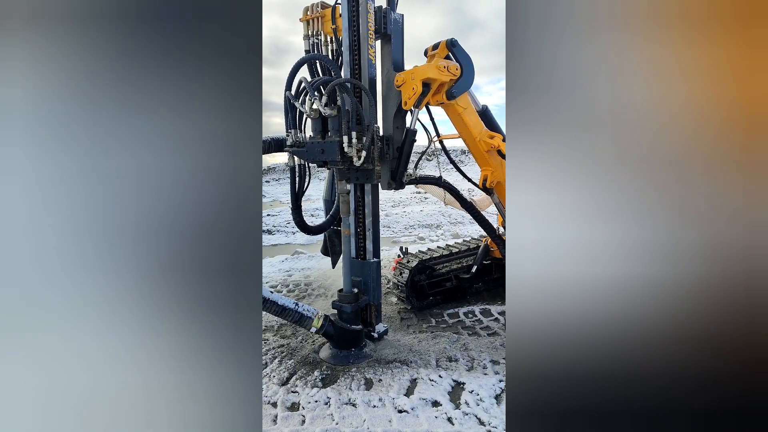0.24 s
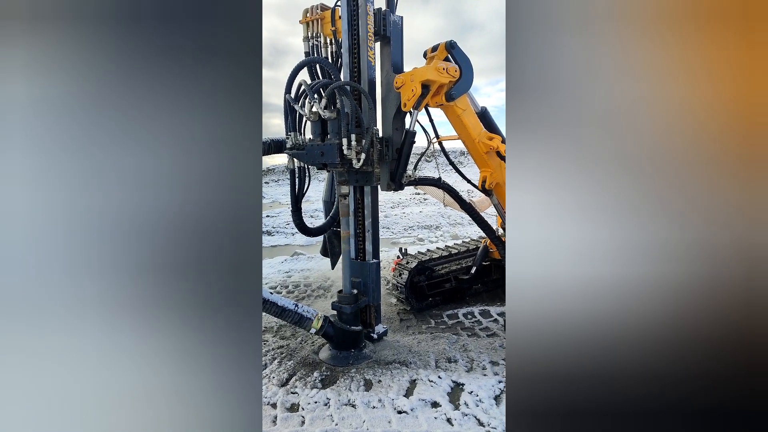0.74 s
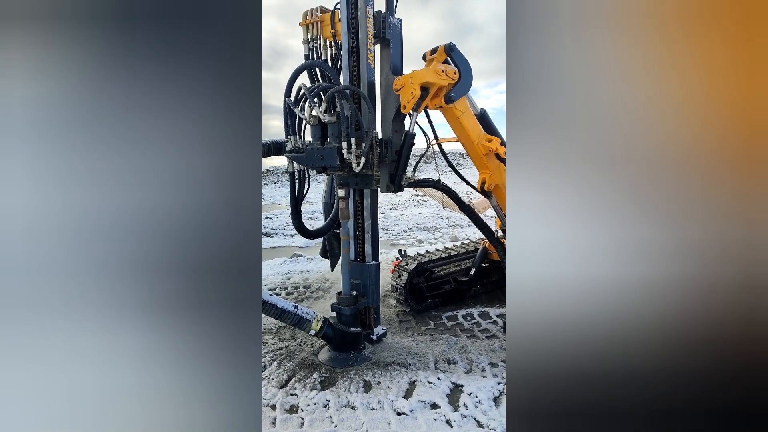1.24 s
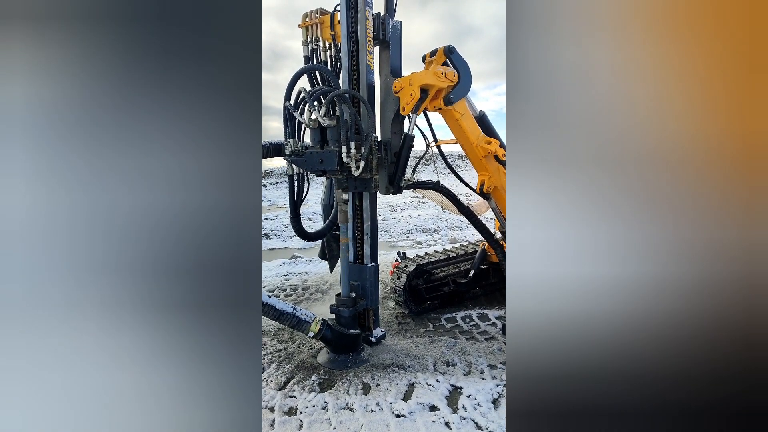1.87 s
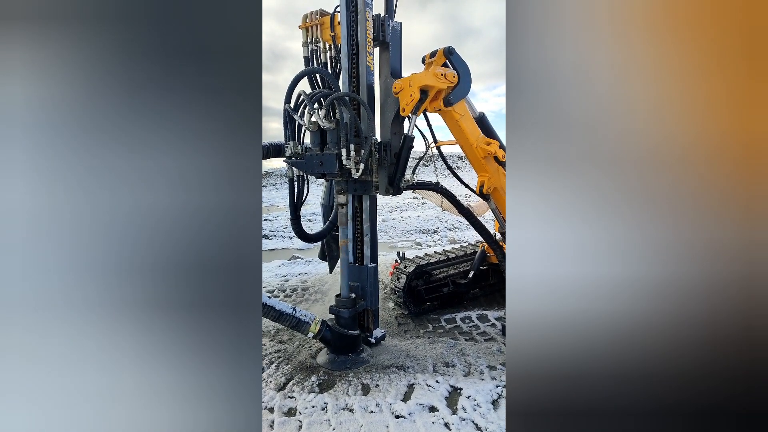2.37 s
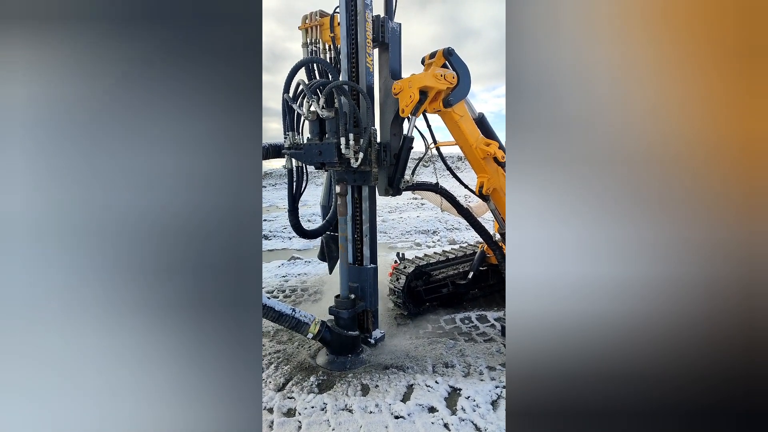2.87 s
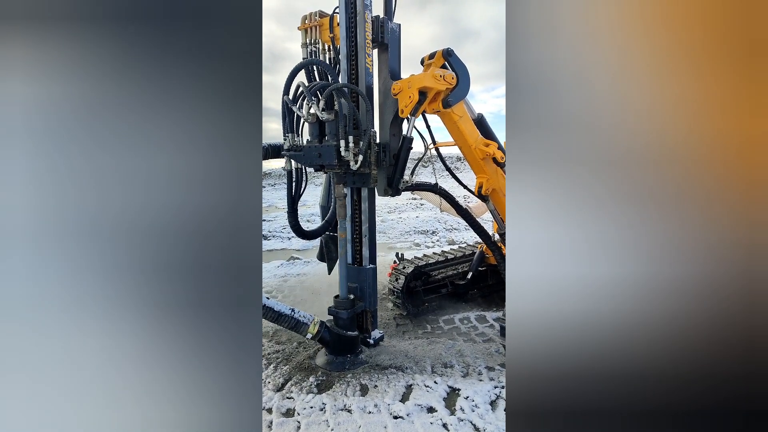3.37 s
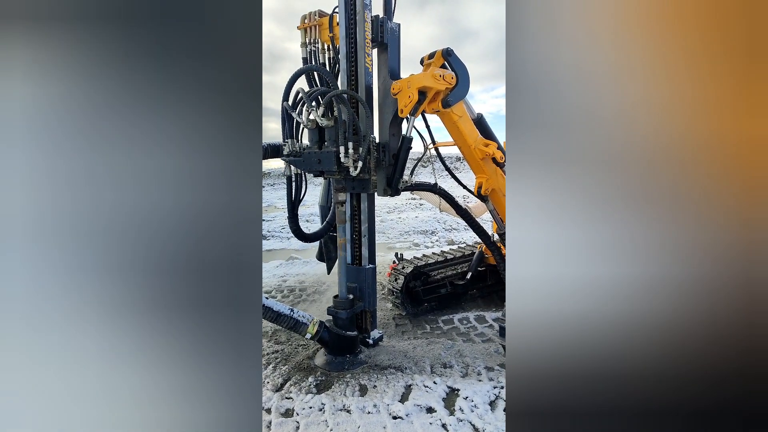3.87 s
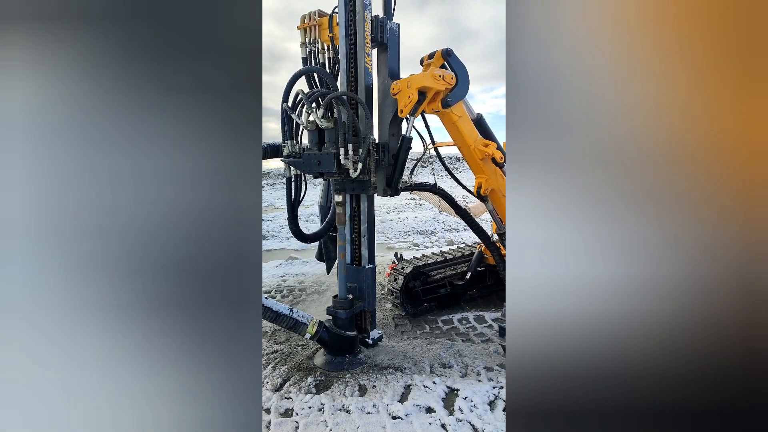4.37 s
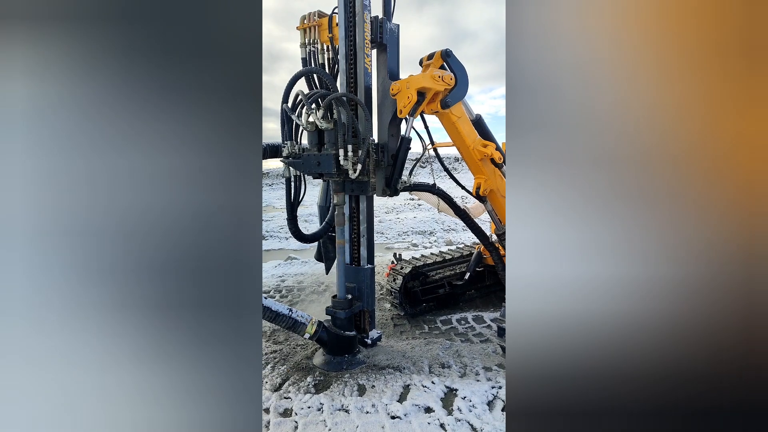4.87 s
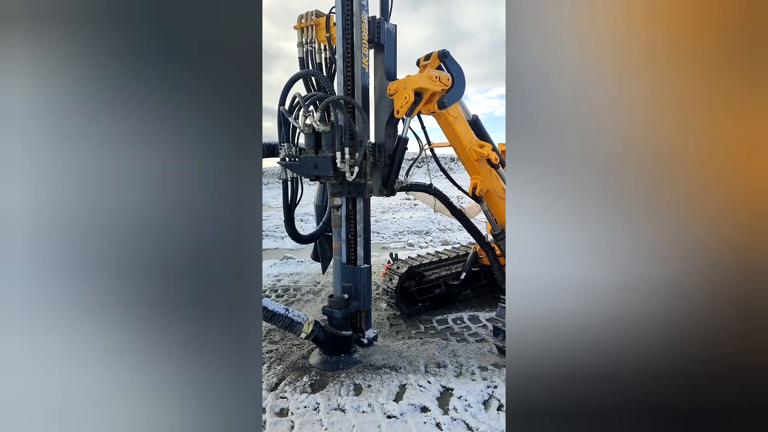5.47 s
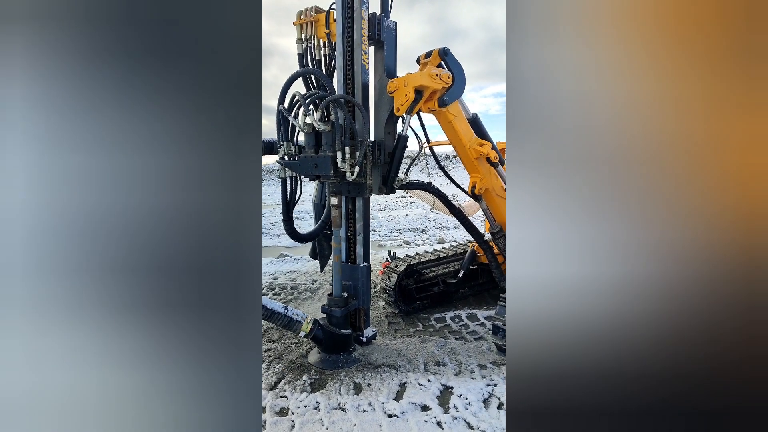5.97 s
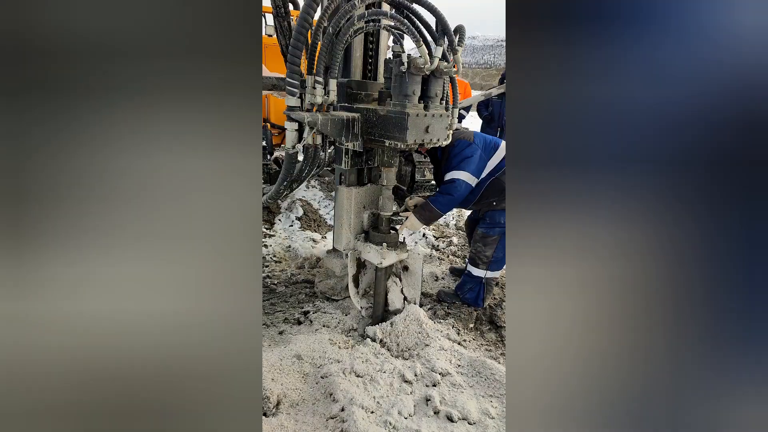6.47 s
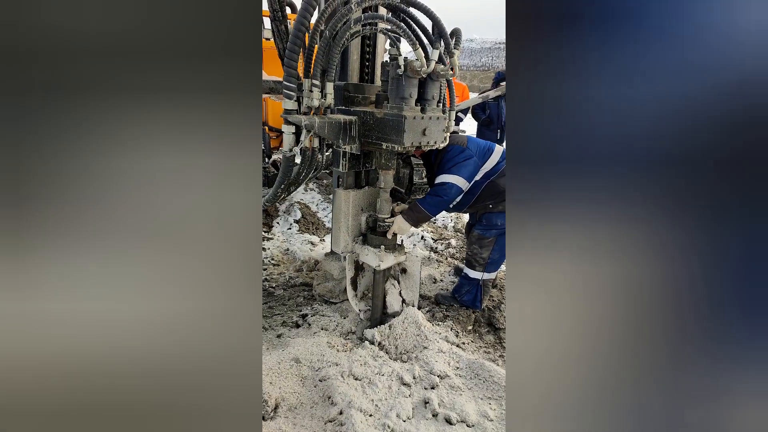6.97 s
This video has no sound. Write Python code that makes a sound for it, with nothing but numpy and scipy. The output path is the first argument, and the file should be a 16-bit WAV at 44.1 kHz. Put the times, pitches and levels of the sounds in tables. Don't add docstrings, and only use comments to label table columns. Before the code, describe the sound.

A dense machine-gun clatter of ringing steel, with bit chatter, low air thumps and piercing port whistle, dominates at close range in open air. It stops for a breathy air flush over engine tones and wind rumble, then resumes with strong puffs, gradually quickening. After an abrupt cut, distant hissing idle, gusts on the microphone and two small metallic taps remain, with phone-like band-limited colour.

```python
import sys
import numpy as np
from scipy import signal
from scipy.fft import rfft, irfft, next_fast_len
from scipy.io import wavfile
from scipy.ndimage import uniform_filter1d, minimum_filter1d

SR = 44100
rng = np.random.default_rng(int(sys.argv[2]) if len(sys.argv) > 2 else 0)


def wav_out(sig):
    wavfile.write(sys.argv[1], SR, np.round(np.clip(np.atleast_2d(sig).T, -1, 1) * 32767).astype(np.int16))


def nominal_scale(level):
    x = np.asarray(level, float) / 20
    return 10 ** x


N = 318654


def in_time(rows):
    s, *columns = np.transpose(rows)
    return [np.interp(np.arange(N) / SR, s, c) for c in columns]


def rms_one(x):
    return x / np.sqrt(np.mean(x ** 2) + 1e-20)


def colour(x, points):
    size = next_fast_len(N + 4096)
    hz, level_db = np.transpose(points)
    log_hz = np.log(np.fft.rfftfreq(size, 1 / SR) + 1)
    gain = nominal_scale(np.interp(log_hz, np.log(hz), level_db))
    return irfft(rfft(x, size) * gain, size)[..., :N]


def drift(rate, channels=1):
    r = np.exp(-80 * np.pi * rate / SR)
    noise = rng.standard_normal((channels, N // 40 + 2002))
    slow = signal.lfilter([1], [1, -2 * r, r * r], noise)[:, 2000:]
    return np.array([np.interp(np.arange(N) / 40, np.arange(len(v)), rms_one(v)) for v in slow])


def resonate(x, hz, width_hz):
    r = np.exp(-np.pi * width_hz / SR)
    g = np.sqrt((1 - r * r) / 2)
    return signal.lfilter([g, 0, -g], [1, -2 * r * np.cos(2 * np.pi * hz / SR), r * r], x + 1e-18)


def spikes(times, sizes):
    out = np.zeros(N)
    np.add.at(out, np.clip((np.asarray(times) * SR).astype(int), 0, N - 1), sizes)
    return out


def decay(x, t60):
    return signal.lfilter([1], [1, -nominal_scale(-60 / (t60 * SR))], x + 1e-18)


def pan(db):
    return nominal_scale(np.array([db / 2, -db / 2]).reshape(2, -1))


# t/s, lead/samples
PORT_LEAD = [(0, 0), (2.75, 0), (2.76, 2), (5.36, 2), (5.37, 0), (6.35, 0), (6.36, 5)]


def pair(alike, source=None):
    common = rng.standard_normal(N) if source is None else source
    late = np.interp(np.arange(N) - np.round(in_time(PORT_LEAD)[0]), np.arange(N), common)
    alike = np.clip(alike, 0, 1)
    return np.sqrt(alike) * np.array([common, late]) + np.sqrt(1 - alike) * rng.standard_normal((2, N))


# first blow t/s, stroke/s, stroke shortening per blow/s, force level/dB, force slope/dB per s
SPELLS = [
    (.0072, .044707, 0, -22, -1.2),
    (5.3924, .05414, .000185, -29, 1),
]


def steady():
    beats = []
    for (start, stroke_s, shorter_s, *_), count in zip(SPELLS, (61, 19)):
        k = np.arange(count)
        beats.append(start + stroke_s * k - shorter_s * k ** 2 / 2)
    return beats


FORCE_TRIM_DB = [0.5, 0.15]
# low level/dB, middle level/dB, high level/dB
GROUP_DB = [(-1.4, 2.8, -1.6), (-1.1, 1.4, -0.51)]
# t/s, force change level/dB, brightness level/dB
FIRST_BLOWS = [(0.0494, -1, 3), (0.0964, 1, 1), (0.1406, -0.5, 0), (0.185, 1.3, -2.2), (0.231, 3.5, 1),
               (0.275, 0.5, 4.5), (0.323, -6.5, 1), (0.366, -6.5, 0.5), (0.4093, 4, 1), (0.4557, -5.5, 4),
               (0.498, 1.5, 7), (0.543, -2, 4), (0.589, -2, 4.5), (0.6333, -4.2, 6), (0.677, 1.5, 4),
               (0.7212, 0.5, 0.5), (0.767, 2, 0.5), (0.8115, 1.5, 0), (0.8583, 0, 3.5), (0.902, -1.5, -4),
               (0.946, 0.5, -2), (0.9893, -2, 3.5), (1.034, 1.5, -1), (1.0802, -0.2, 4.5), (1.13, 0, 5),
               (1.1727, -1, -1), (1.215, -1, 2.5), (1.258, 0, -1), (1.3069, -3, -1.5), (1.347, 1.3, 1.5),
               (1.3924, 3, 0), (1.4362, 2, -1), (1.482, -0.5, -1), (1.526, 0.5, -2.5), (1.571, -5, 10),
               (1.6203, -2, 4), (1.664, 1, 4.5), (1.705, 1, -1), (1.756, -0.5, -0.5), (1.801, -2, -1.5),
               (1.8433, 0.5, -1), (1.8874, 2.5, 0.5), (1.9304, 3, 0.5), (1.977, -2, 2.5), (2.026, -6.5, 8),
               (2.067, 3.5, -1), (2.11, -1.5, 5), (2.153, 5, -1), (2.201, -0.5, 2), (2.2476, 1.5, 0),
               (2.29, -1.2, 5.5), (2.333, 4.9, 2), (2.384, -1, 1), (2.427, 2.7, -4), (2.468, -0.5, 2),
               (2.512, -3.5, 3), (2.556, 1.5, -3), (2.6014, 0.5, 0.5), (2.6435, -3.5, 0.5),
               (2.693, -3.3, 8)]
# t/s, force change level/dB, brightness level/dB
SECOND_BLOWS = [(5.393, 1.5, -3), (5.447, 0, -2), (5.5, 0.2, 4.5), (5.5523, 1, 0.7), (5.6058, 0.5, 2.5),
                (5.66, 0, 1), (5.7114, 1.5, 1), (5.7665, 5, 0), (5.822, 0, 3), (5.8708, -1.5, 1.5),
                (5.922, 3.5, 2), (5.976, -0.3, 3), (6.0304, -1.5, 0.5), (6.081, -1, 5.5), (6.134, 3.5, -1),
                (6.186, 4, 0.5), (6.235, -3, -1.5), (6.2872, 0.5, -2), (6.3347, 1, 4.5)]
BRIGHT_SHARE, FORCE_SHARE = (-0.73, 0.79, 0.54), (1, 0.99, 0.92)


def blows():
    out = []
    landings = (FIRST_BLOWS, SECOND_BLOWS)
    for s, spell, trim_db, group_db, lands in zip(steady(), SPELLS, FORCE_TRIM_DB, GROUP_DB, landings):
        start, _, _, force_db, slope = spell
        even_db = force_db + trim_db + slope * (s - start)
        rows = np.column_stack([s, even_db[:, None] + group_db])
        for at, harder_db, bright_db in lands:
            k = np.abs(s - at).argmin()
            change_db = harder_db * np.array(FORCE_SHARE) + bright_db * np.array(BRIGHT_SHARE)
            rows[k] = [at, *(rows[k, 1:] + change_db)]
        out.append(rows)
    return out


def stroke():
    return np.minimum(decay(spikes(np.vstack(blows())[:, 0], 1), t60=0.43), 1.5)


def chatter_noise():
    clicks = rng.standard_normal(N) * nominal_scale(3.0 * np.minimum(rng.exponential(1, N), 4))
    clicks = clicks * (rng.random(N) < 5000 / SR)
    chatter = pair(0.62, rms_one(clicks))
    return rms_one(rms_one(chatter) + 0.54 * pair(0.36))


# t/s, low level/dB, middle level/dB, high level/dB
STRAY_KNOCKS = [
    (2.787, -42, -21, -26),
    (2.85, -39, -38, -39),
    (2.92, -42, -38, -39),
    (4.425, -55, -32.5, -29),
    (4.451, -45, -51, -59),
]
# f/Hz, width/Hz, level/dB
STEEL_MODES = [(916, 42, -13.5), (1222, 400, -3), (1684, 220, -11.5), (1865, 47, -7), (2086, 49, -8.5),
               (2346, 110, -10), (2520, 57, -13), (2772, 52, -9.5), (3120, 88, -12.5), (3675, 84, -17.5),
               (3474, 47, -17), (4100, 37, -27), (4350, 47, -16), (4725, 170, -10), (5460, 180, -14.5),
               (5860, 63, -29), (6085, 110, -7), (6390, 52, -13), (6940, 110, -5.5), (7450, 600, -1),
               (7590, 190, -3.5), (8300, 210, -9), (10730, 360, -3.5), (12520, 330, -1.5),
               (12970, 320, -4.5), (13560, 310, -5.5), (14670, 320, 0.5), (15450, 190, 4.5)]


def steel():
    rows = np.vstack([*blows(), STRAY_KNOCKS])
    rows[:, 1:] += 1.43 * rng.standard_normal((len(rows), 3))
    chatter = chatter_noise()
    starts = rows[:, 0] + 0.0003 * rng.standard_normal(len(rows))
    out = 0
    for hz, width_hz, level_db in STEEL_MODES:
        luck = rng.standard_normal((len(rows), 3))
        group = np.searchsorted((2150, 3900), hz)   # low, middle or high, split in Hz
        size = nominal_scale(rows[:, 1 + group] + level_db + 2.65 * luck[:, 0])
        rebound = spikes(starts + 0.0078 + 0.0034 * luck[:, 1], 0.5 * size * nominal_scale(3.5 * luck[:, 2]))
        force = decay(spikes(starts, size) + rebound, t60=0.13 + hz * 6e-6)
        force = force + 0.4 * decay(spikes(starts + 0.0013, size), t60=0.0089)
        out = out + resonate(chatter * force, hz, 0.83 * width_hz)
    for group, band in enumerate([(900, 2150), (2150, 5000), (5000, 15500)]):
        size = nominal_scale(rows[:, 1 + group] - 8.5)
        hits = spikes(starts, size) + spikes(starts + 0.0049, 0.62 * size)
        crack = decay(hits, t60=(.1, .14, .3)[group])
        crack = crack * nominal_scale(0.46 * drift(110))
        band_filter = signal.butter(1, band, "band", fs=SR, output="sos")
        out = out + crack * rms_one(signal.sosfilt(band_filter, chatter))
    return out * pan(in_time(AIRFLOW)[1])


# t/s, peak level/dB, ring f/Hz
CONTACTS = [(0.0498, 1, 2290), (0.0952, -7, 2280), (0.1421, -4.5, 1840), (0.1925, -8, 1860),
            (0.1984, -5, 2160), (0.2314, -10, 2220), (0.2763, -12, 2040), (0.3232, -4, 1830),
            (0.3676, -7.5, 2310), (0.4155, -10, 2540), (0.4155, -2, 2230), (0.4569, -14, 2290),
            (0.4988, -4, 2340), (0.5442, -16, 2330), (0.5891, -7.5, 1730), (0.634, -5, 1860),
            (0.6789, -4, 2350), (0.7672, -9, 2030), (0.8165, -2, 2320), (0.857, -10, 2250),
            (0.9053, -4.5, 2350), (0.9477, -8, 1800), (0.9896, -9, 2320), (1.0355, -7, 2320),
            (1.039, -3, 2310), (1.1303, 1, 1820), (1.1757, -11, 3080), (1.1757, -4, 1850),
            (1.2196, -21, 1850), (1.3139, -22, 1650), (1.3139, -12, 1890), (1.3483, -20, 1200),
            (1.3483, -19, 2250), (1.3937, -13, 1900), (1.4366, -11, 1860), (1.483, -9, 1750),
            (1.4885, -10, 1810), (1.5264, -3, 1810), (1.6676, -9, 2300), (1.7105, -2.5, 2330),
            (1.7564, -7, 1840), (1.8457, -12, 2050), (1.8896, -10, 2340), (1.9345, -11, 1900),
            (1.9799, -4.5, 1860), (2.0263, -12, 2300), (2.0682, -10, 1900), (2.1146, -24, 2000),
            (2.1565, -19, 2100), (2.2054, -12, 1890), (2.2368, -6, 2330), (2.2488, -5, 2400),
            (2.2947, -6, 1840), (2.3391, -7, 3220), (2.3391, 3, 2280), (2.4304, -14, 1860),
            (2.5162, -14, 1820), (2.607, -10, 1850), (2.6439, -7.5, 1870), (2.6968, -17, 1850),
            (5.3934, -18, 2390), (5.4468, -18, 1870), (5.4512, -22, 1830), (5.502, -9, 2540),
                 (5.5544, -11.5, 2540), (5.6064, -5.5, 2720), (5.6113, -14, 2070), (5.6602, -17.5, 1940),
                 (5.6654, -9, 2840), (5.7153, -5.5, 2780), (5.7654, -10.5, 1910), (5.8233, -12, 1400),
                 (5.8233, -16, 1830), (5.8735, -15, 1880), (5.9246, -11, 1870), (5.978, -15, 1740),
                 (5.9818, -19, 1860), (6.0293, -16, 1870), (6.0822, -29, 1970), (6.0897, -26, 2330),
                 (6.134, -13, 1900), (6.189, -12.5, 1890), (6.2343, -20, 1870), (6.2399, -15, 1880),
                 (6.2874, -15, 1860), (6.3375, -13, 1850),
            (2.7894, -8, 2440),
    (4.4238, -15, 1890),
]


def contacts():
    out, t = np.zeros(N + 4000), np.arange(4000) / SR
    rise_s, ring_t60_s, snap_t60_s = 0.00064, .026, .02
    band = signal.butter(2, [1100, 8500], "band", fs=SR, output="sos")
    for s, db, hz in CONTACTS:
        rise = (1 - np.exp(-t / rise_s)) * nominal_scale(db - 3.5)
        tone = np.sin(2 * np.pi * hz * t)
        tone = tone + 0.39 * np.sin(2 * np.pi * .82 * hz * t) + .35 * np.sin(2 * np.pi * 1.4 * hz * t)
        ring = nominal_scale(-60 * t / ring_t60_s) * tone
        snap = nominal_scale(-10 - 60 * t / snap_t60_s) * signal.sosfilt(band, rng.standard_normal(len(t)))
        out[int(s * SR):int(s * SR) + 4000] += rise * (ring + snap)
    return out[:N] * np.ones((2, 1))


# puff peak level/dB, whistle level/dB, starting pressure surge level/dB,
# puff slope/dB per s, whistle slope/dB per s
EXHAUST_AIR = [
    (-18, -24.5, -2, -0.3, 0.5),
    (-12.5, -31, 7.5, -5, 2),
]
# suction/0-1, ring/0-1, ring f/Hz, return puff ahead of blow/share of stroke,
# first puff level/dB
HOLE = [
    (.5, .3, 205, .32, -3),
    (.9, .5, 238, .355, 0),
]
SURGE_S = 0.15


def puffs():
    t = np.arange(-200, 1400) / SR + np.zeros((2, 1))
    after = np.maximum(t - .0015, 0)
    push = np.exp(-.5 * (t / .0012) ** 2)
    suction = -.65 * np.sin(2 * np.pi * 42 * after) * np.exp(-after / .011)
    out = 0
    for s, exhaust, hole in zip(steady(), EXHAUST_AIR, HOLE):
        puff_db, _, surge_db, sag, _ = exhaust
        pull, ring, ring_hz, ahead, first_db = hole
        at = np.concatenate([s + .0094, s - ahead * np.gradient(s)])
        level_db = puff_db + first_db * (np.arange(len(at)) < len(s))
        level_db = level_db + surge_db * np.exp((at.min() - at) / SURGE_S) + sag * (at - s[0])
        size = nominal_scale(level_db + 1.1 * rng.standard_normal(len(at)))
        ringing = -.42 * np.sin(2 * np.pi * ring_hz * np.maximum(t - .0022, 0)) * np.exp(-after / .012)
        puff = push + pull * suction + ring * ringing
        out = out + signal.fftconvolve([spikes(at, size * (at > 0))], puff, axes=1)[:, 200:N + 200]
    return out * pan(1.3)


# f/Hz, width/Hz, level/dB
WHISTLE = [
    (7235, 49, 1),
    (7260, 36, -2),
    (7190, 73, -6),
    (12430, 180, -2.5),
]


def whistle():
    t, level = np.arange(N) / SR, 0
    stop_s, surge_share = 0.036, 0.16
    for rows, (_, whistle_db, surge_db, _, sag) in zip(blows(), EXHAUST_AIR):
        first, last = rows[0, 0], rows[-1, 0]
        since = (t - first).clip(0)
        shut = np.clip(1 + (last - t) / stop_s, 0, 1) * (t > first - .03)
        surge = surge_share * surge_db * np.exp(-since / SURGE_S)
        level = level + shut * nominal_scale(whistle_db + surge + sag * since)
    noise = pair(0.28)
    tone = sum(nominal_scale(db + 2.0 * drift(25.0)) * resonate(noise, hz, width_hz) for hz, width_hz, db in WHISTLE)
    return level * nominal_scale(-3.0 * stroke() + 1.5) * np.minimum(4 * stroke(), 1) * tone


# t/s, level/dB, left-right level/dB
AIRFLOW = [
    (0, -27, 1),
    (2.6, -27.5, 1),
    (2.85, -19.5, -2),
    (3.5, -20, -2.5),
    (4.2, -21, -1.5),
    (4.8, -20, -1.5),
    (5.35, -21.5, -1),
    (5.388, -29, 2),
    (5.4, -32, -1),
    (6.35, -29.5, 1),
]
# f/Hz, level/dB per Hz
AIR = [(60, -47), (150, 2), (300, -4.5), (500, -5), (800, -5), (1230, -10), (1400, -10), (1900, -12.5),
       (2250, -16.5), (2700, -13.5), (3500, -14), (4500, -18), (7500, -20), (15000, -17.5)]


def airflow():
    level_db, pan_db = in_time(AIRFLOW)
    near, far = pair(0.63), pair(0.083)
    split = signal.butter(2, 3000, fs=SR, output="sos")
    flow = rms_one(colour(far + signal.sosfiltfilt(split, near - far), AIR))
    low = signal.sosfiltfilt(signal.butter(1, 700, fs=SR, output="sos"), flow)
    hiss = flow - low
    flow = low * nominal_scale(0.92 * drift(42)) + hiss * nominal_scale(0.63 * drift(27) + 3.2 * stroke())
    return nominal_scale(level_db + 0.16 * drift(2.7)) * flow * pan(pan_db)


# f/Hz, width/Hz, level/dB
ENGINE = [(60, 5, -31), (102, 8, -38), (235, 6, -32), (270, 6, -35), (305, 6, -39), (1325, 25, -39),
          (1380, 70, -41), (1541, 8, -44), (1676, 8, -41), (1840, 110, -36), (1913, 10, -43),
          (2948, 8, -52)]
# t/s, level/dB
ENGINE_HEARD = [
    (0, -9.5),
    (2.5, -8.5),
    (2.85, 0),
    (5.35, -2),
    (5.4, -11),
]


def engine():
    noise = pair(0.99)
    tones = sum(nominal_scale(db) * resonate(noise, hz, width_hz) for hz, width_hz, db in ENGINE)
    return nominal_scale(in_time(ENGINE_HEARD)[0]) * tones


# f/Hz, level/dB per Hz
IDLING = [(200, 13), (600, -8.5), (1000, 1.5), (1450, -4.5), (1900, -8.5), (2500, -10), (3500, -14),
          (5000, -14), (7500, -11.5), (10000, -16), (13000, -11), (15000, -2.5)]
# t/s, level/dB, f/Hz, t60/s
TICKS = [
    (6.447, -31, 1680, .06),
    (6.783, -29, 2370, .09),
    (6.398, -44, 1300, .02),
]


def second_rig():
    t = np.arange(N) / SR
    from_s, fade_s = 6.375, 0.11
    level = nominal_scale(-32.5) * np.clip((t - from_s) / fade_s + 0.13, 0, 1)
    noise = pair(0.27)
    hiss = rms_one(colour(noise, IDLING)) * nominal_scale(1.5 * drift(23) + 6.5)
    pump = nominal_scale(-15) * resonate(noise, 1450, 25)
    ticks = 0
    for s, db, hz, t60 in TICKS:
        envelope = nominal_scale(db - 60 * (t - s).clip(0) / t60) * np.clip((t - s) / 0.0021, 0, 1)
        ticks = ticks + envelope * np.sin(2 * np.pi * hz * (t - s))
    return level * (hiss + pump) + ticks


# t/s, level/dB, left-right level/dB
BREEZE = [(0, -30, -5), (1.2, -32, -3.5), (2.45, -32, 3), (2.7, -46, -8), (2.8, -29.5, -8),
          (5.3, -23, -6.5), (5.4, -29.5, -13.5), (6.34, -22.5, -2), (6.352, -82, -7), (6.368, -36, -5),
          (6.54, -31, -2), (6.72, -21.5, -7), (7.225, -23.5, -6.5)]
# t/s, peak level/dB, length/s, left-right level/dB
GUSTS = [(2.581, -22, 0.023, 10), (3.213, -24, 0.028, -12), (3.32, -26, 0.036, -7), (3.68, -24, 0.036, -11),
         (3.91, -34, 0.082, -4), (4.05, -23, 0.088, -16), (4.17, -14, 0.033, -7), (4.565, -27.5, .07, 3),
         (4.695, -20, 0.032, 0), (4.997, -22, 0.038, -12), (5.256, -17.5, 0.022, -2),
         (6.694, -28.5, 0.034, -21), (6.813, -20, 0.035, -9), (6.958, -18, 0.027, -7), (7.03, -36, .06, -4)]
# f/Hz, level/dB per Hz
WIND_SPECTRUM = [(20, -7.5), (60, -1), (150, -3), (300, -5.5), (500, -13.5), (800, -17), (1500, -26),
                 (4000, -90)]


def wind():
    level_db, pan_db = in_time(BREEZE)
    t = np.arange(N) / SR
    power = (nominal_scale(level_db) * pan(pan_db)) ** 2
    for s, db, length_s, side_db in GUSTS:
        power = power + (nominal_scale(db) * pan(side_db)) ** 2 * np.exp(-((t - s) / length_s) ** 2)
    lumps = nominal_scale(2.17 * drift(13) + 1.5 * drift(41, channels=2))
    return nominal_scale(-1.0) * np.sqrt(power) * rms_one(colour(pair(0.24) * lumps, WIND_SPECTRUM))


# t/s, level/dB
FIRST_RIG_FADE = [
    (0, -2),
    (6.345, 1.5),
    (6.348, -50),
    (6.358, -64),
    (6.361, -82),
    (7.3, -86),
]


def scene():
    first = steel() + contacts() + puffs() + whistle() + airflow() + engine()
    return nominal_scale(in_time(FIRST_RIG_FADE)[0]) * first + second_rig() + wind()


# f/Hz, lag/samples
RIGHT_LAG = [(170, 0), (350, 2), (520, 7), (900, 7), (1250, 31), (1550, 26), (1900, 23), (2800, 22),
             (16000, 22.5)]


def around(x):
    size = next_fast_len(N + 4096)
    hz = np.fft.rfftfreq(size, 1 / SR)
    lag = np.interp(hz, *np.transpose(RIGHT_LAG))
    return irfft(rfft(x, size) * np.exp(-2j * np.pi * hz / SR * lag), size)[:N]


# f/Hz, level/dB
MIC_LEFT = [(20, 6), (8400, -1.5), (8750, -6.5), (9000, -16), (9400, -21), (9900, -17.5), (11000, -18.5),
            (12200, -14), (14800, -16), (15600, -26)]
# f/Hz, level/dB
MIC_RIGHT = [(20, 4), (600, 1), (1050, -8), (1400, -0.5), (1850, 6), (2800, 3.5), (5000, -3), (6600, 0),
             (7400, -0.5), (7900, -18), (8350, -48), (9350, -46), (9700, -18), (12200, -12), (15600, -24)]


def microphones(dry):
    return np.array([colour(dry[0], MIC_LEFT), around(colour(dry[1], MIC_RIGHT))])


def limiter(x):
    room = np.minimum(1, .95 / (np.abs(x).max(axis=0) + 1e-9))
    return x * uniform_filter1d(minimum_filter1d(room, size=257), size=257)


# f/Hz, quiet threshold/spreads, rise under the hammer/spreads
DROPOUT = [(2500, -5, 1), (3000, -4, 2.2), (4300, -4, 2.6), (5300, -2.2, 1.9), (5700, -4, 2.8),
           (6100, -5, 1), (8400, -4, 1.5), (9100, -1.5, 0.6), (9450, -0.3, 4), (9850, -0.3, 1.5),
           (10150, -0.5, 0.4), (10700, -0.5, 0.3), (11500, -0.8, 1.4), (12000, -1.2, 0.8),
           (12600, -1.2, -2), (13200, -0.4, -0.4), (14400, -0.4, 0.2), (15300, -0.1, 0.6), (15700, 0.5, 1)]


def dropouts(x):
    hz, _, cells = signal.stft(x, SR, "cosine", nperseg=1024, noverlap=512)
    power = (np.abs(cells[:, :512]) ** 2).mean(axis=0)
    level = 10 * np.log10(power.reshape(64, 8, -1).mean(axis=1) + 1e-14)
    slow = uniform_filter1d(level, size=25, axis=1)
    masked = np.clip((uniform_filter1d(level[21], size=5) + 56) / 12, 0, 1)
    dip = uniform_filter1d(level - slow, size=3, axis=1).clip(-8, 4)
    luck = uniform_filter1d(rng.standard_normal(level.shape), size=4, axis=1)
    score = .4 * masked * dip + 2 * luck
    at, quiet, rise = np.transpose(DROPOUT)
    centre = hz[4:512:8]
    edge = np.interp(centre, at, quiet)[:, None] + np.interp(centre, at, rise)[:, None] * masked
    cells[:, :512] *= np.repeat(score > edge * score.std(axis=1)[:, None], 8, axis=0)
    return signal.istft(cells, SR, "cosine", nperseg=1024, noverlap=512)[1][:, :N]


# t/s, level/dB
GAP = [
    (0, 0),
    (6.3465, 0),
    (6.349, -8),
    (6.358, -8),
    (6.361, -30),
    (6.367, -30),
    (6.369, 0),
    (7.3, 0),
]


def gap(x):
    return x * nominal_scale(in_time(GAP)[0])


def low_pass(x):
    return signal.sosfilt(signal.butter(12, 15730, fs=SR, output="sos"), x)


def record(dry):
    mix = gap(dropouts(limiter(microphones(dry))))
    return low_pass(mix)


dry = scene()
out = record(dry)
wav_out(out)
```